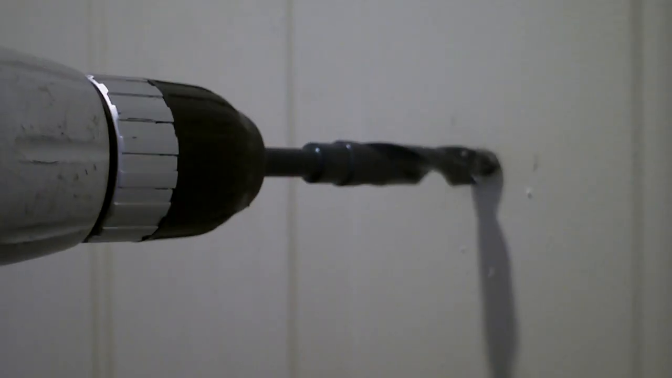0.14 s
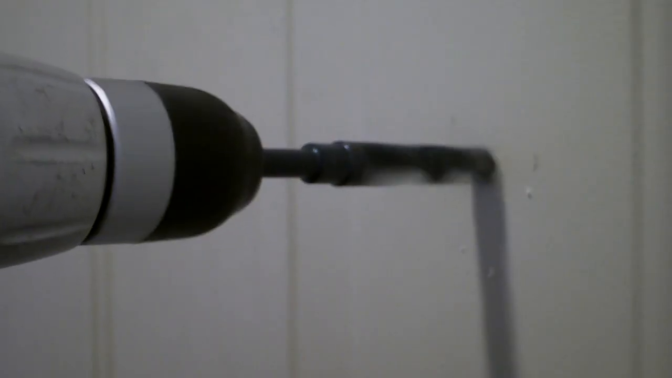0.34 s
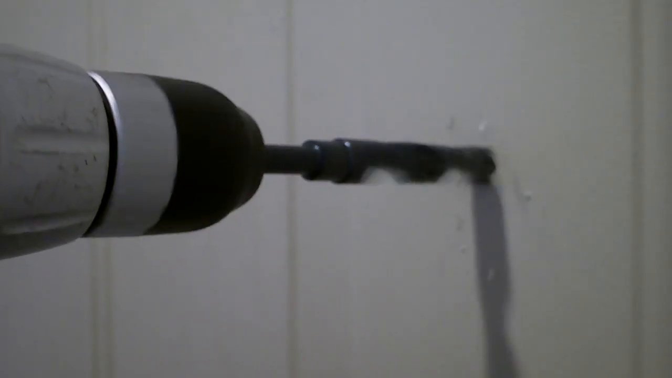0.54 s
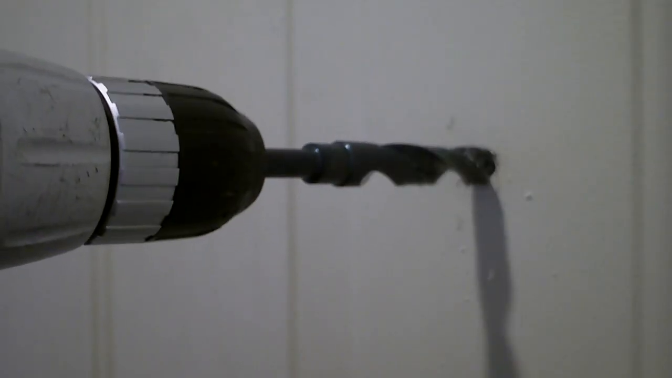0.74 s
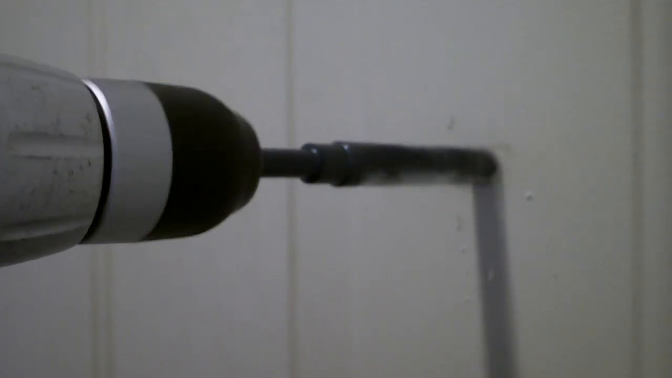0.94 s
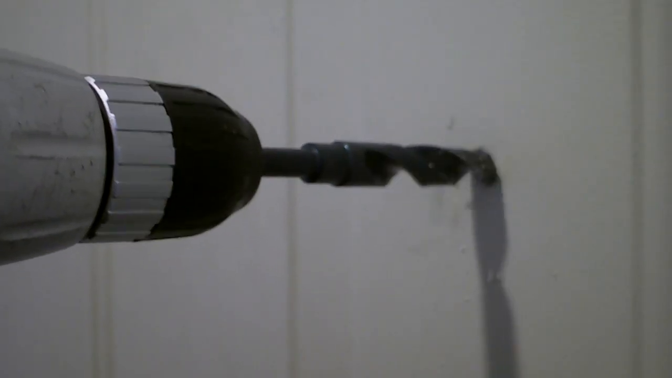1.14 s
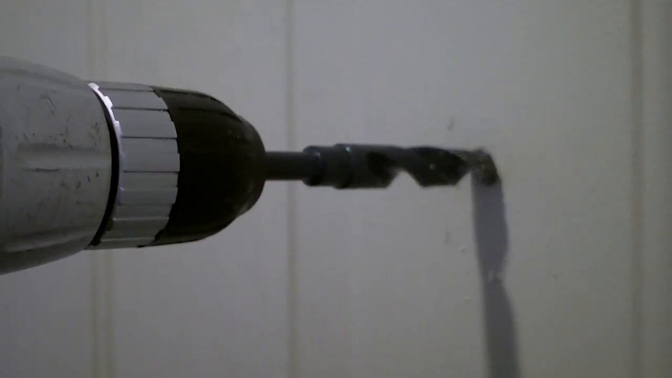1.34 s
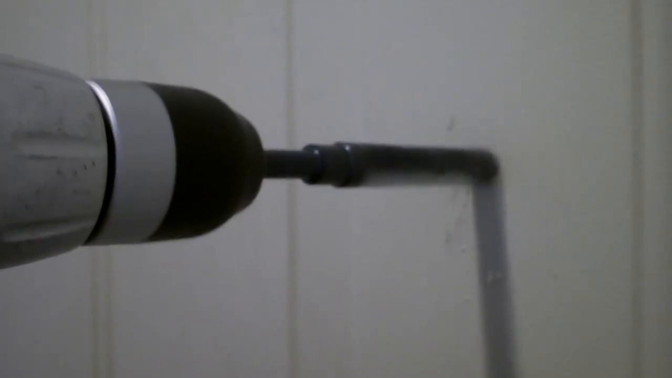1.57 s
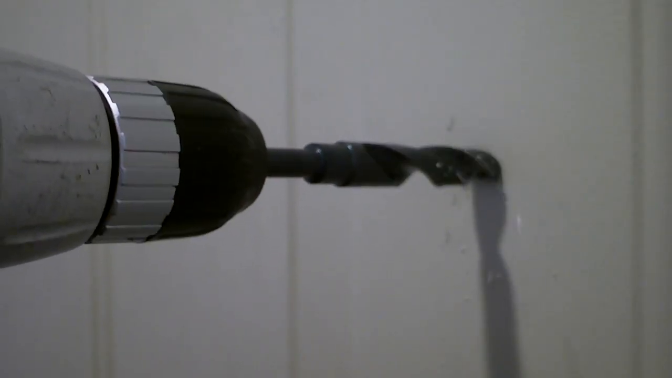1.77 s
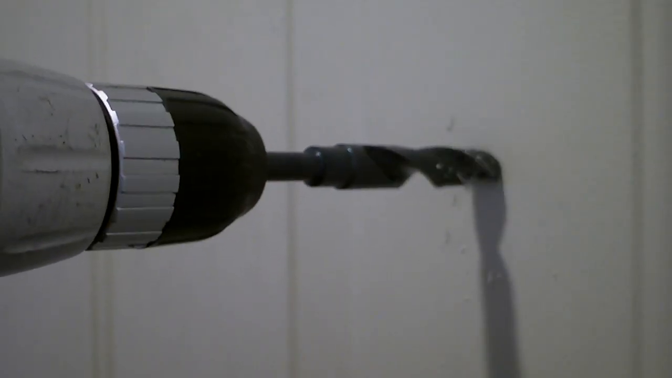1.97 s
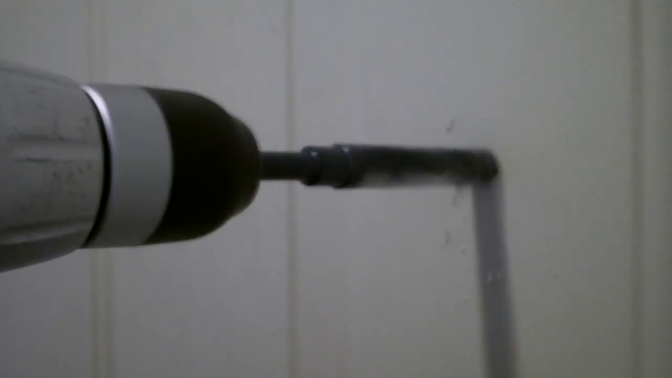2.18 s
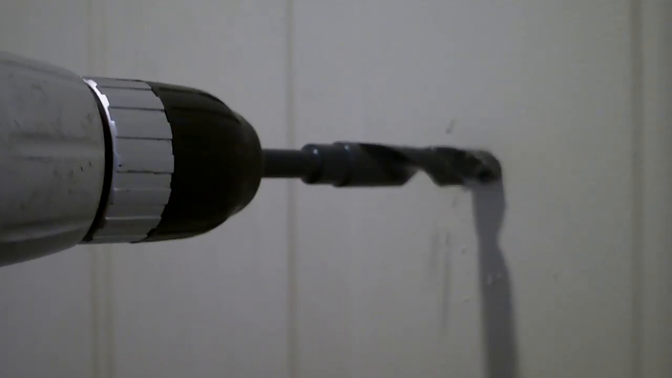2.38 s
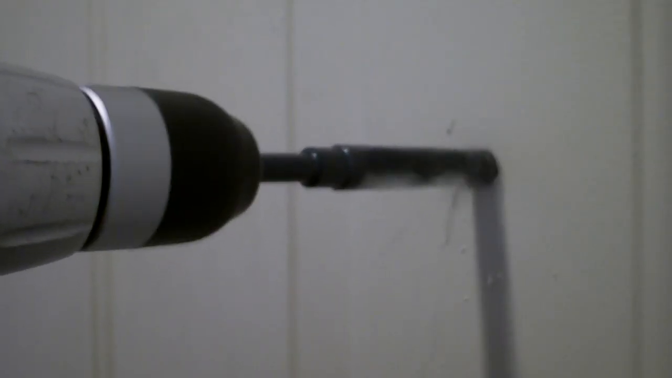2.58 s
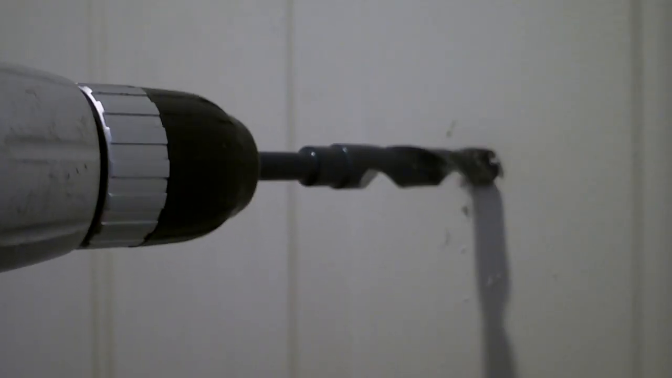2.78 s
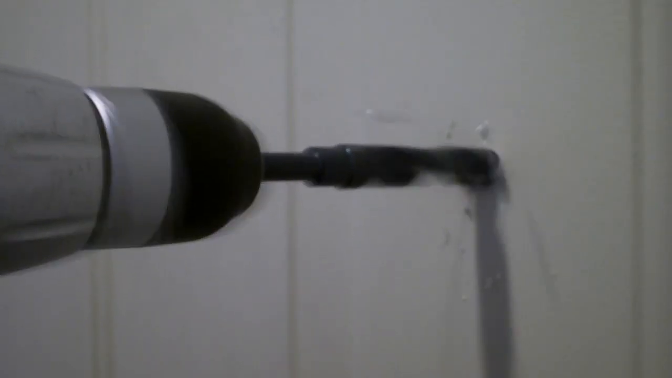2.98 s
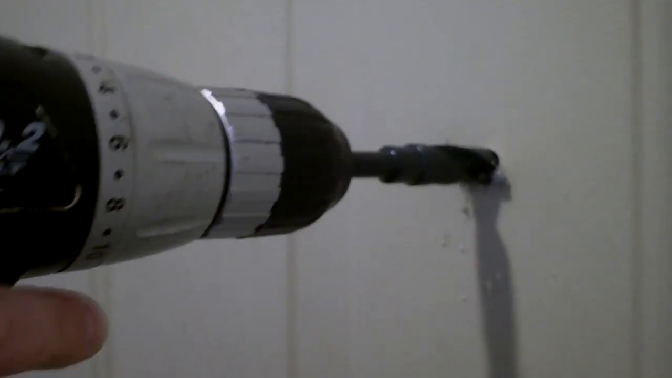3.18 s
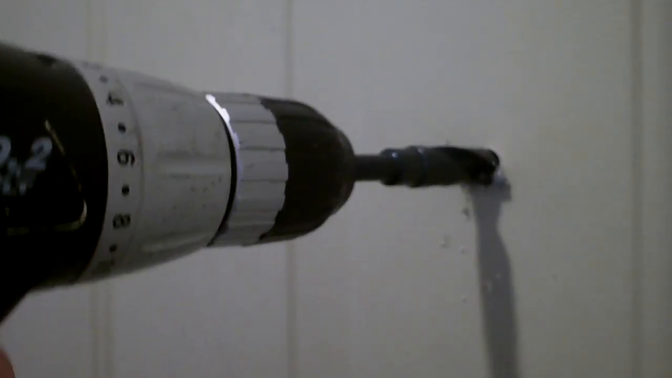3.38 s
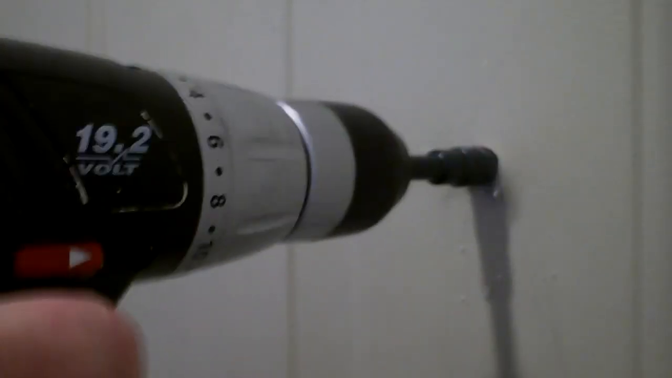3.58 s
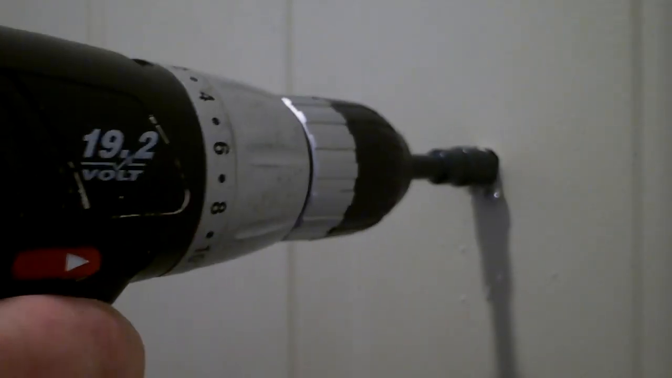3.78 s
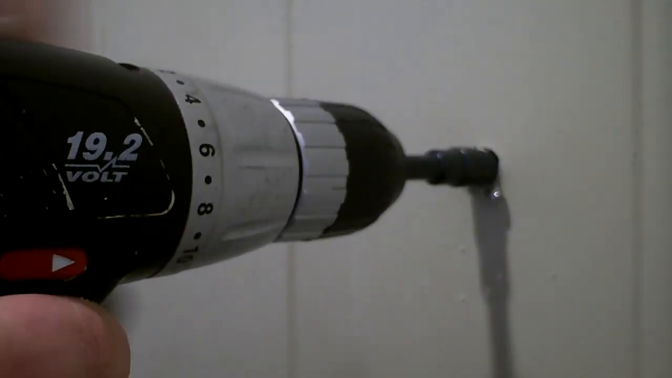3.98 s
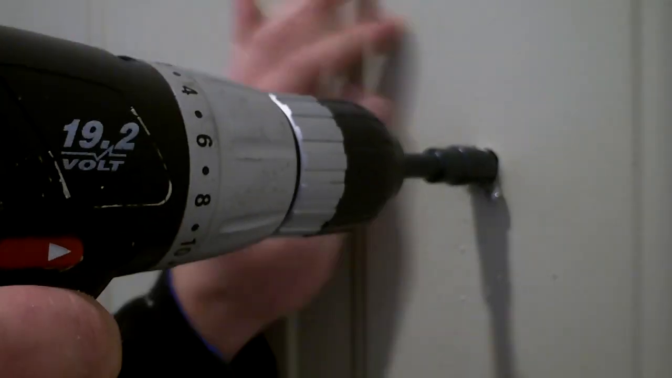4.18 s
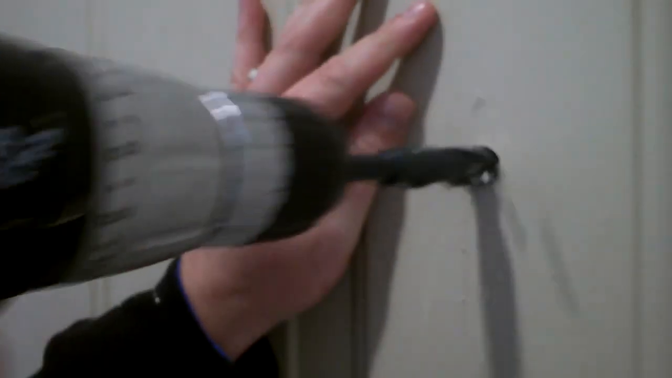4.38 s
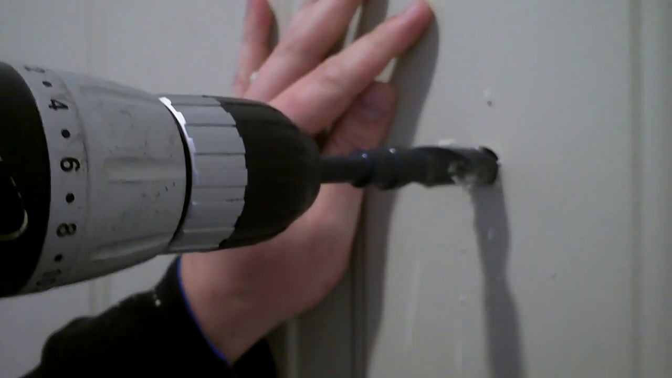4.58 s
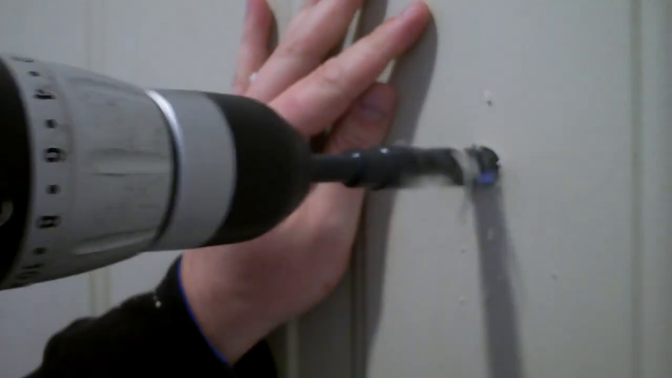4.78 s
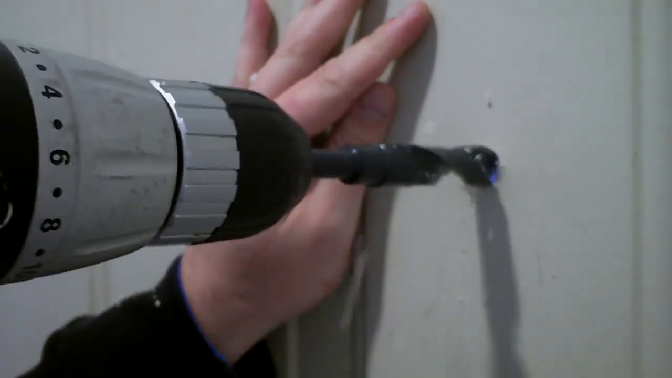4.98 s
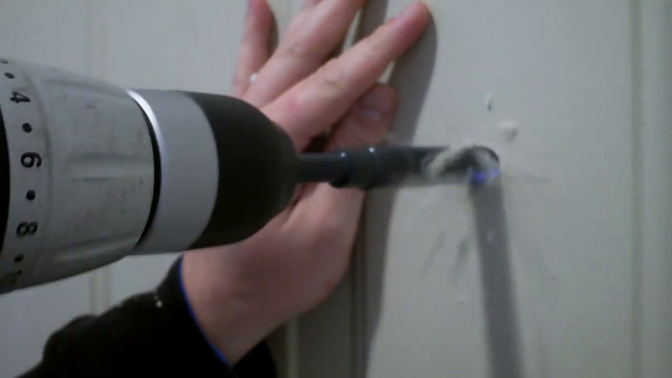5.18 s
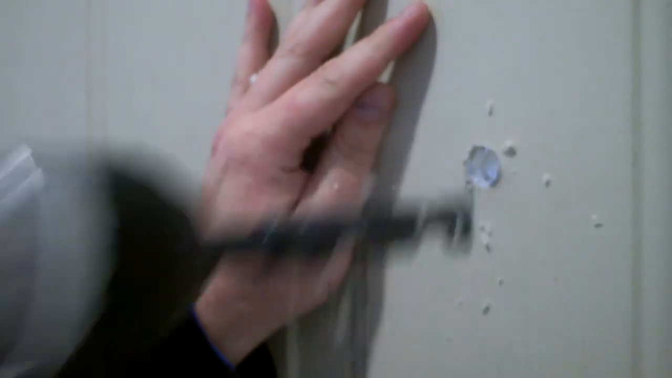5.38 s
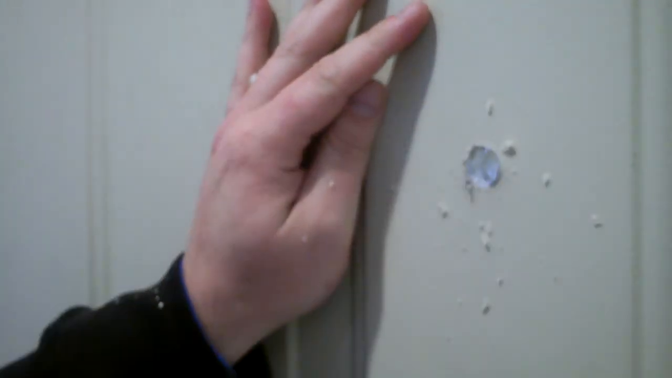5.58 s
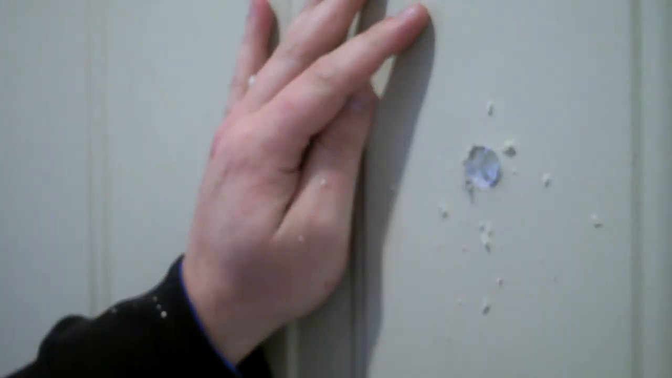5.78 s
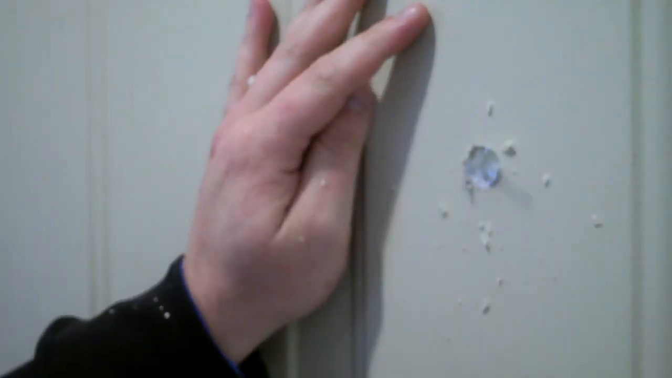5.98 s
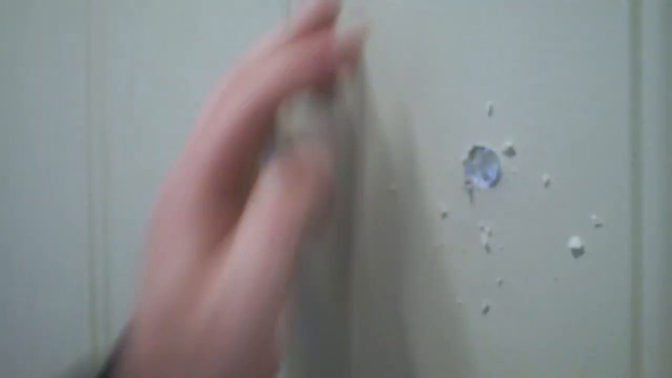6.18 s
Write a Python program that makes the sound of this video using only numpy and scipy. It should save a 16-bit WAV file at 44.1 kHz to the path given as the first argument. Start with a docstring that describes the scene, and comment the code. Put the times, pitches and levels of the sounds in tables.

```python
"""First comes the dying grind and drumming of a cordless drill in a hollow sheet-metal door, close to
one microphone in a small, bare room. Ten more pulls of the trigger follow: the controller whistles,
the gears spin up and rattle, the bit grinds off chips and drums the panel. In the later pulls
the bit snags, squeals, jolts the door and finally tears through the sheet."""
import sys
import numpy as np
from scipy import signal
from scipy.fft import rfft, irfft
from scipy.io import wavfile
from scipy.ndimage import uniform_filter1d

SR = 44100
rng = np.random.default_rng(int(sys.argv[2]) if len(sys.argv) > 2 else 0)


def inscribe(sig):
    """Save sig as 16-bit PCM at rate SR to the path in sys.argv[1].

    A 1-D sig is mono; a 2-D sig holds one channel per row.
    Samples are clipped to [-1, 1] before scaling.
    """
    pcm = np.round(np.clip(np.atleast_2d(sig).T, -1, 1) * 32767)
    wavfile.write(sys.argv[1], SR, pcm.astype(np.int16))


N = 274829
TIME = np.arange(N) / SR

# trigger pulls: start_s, length_s, run_up_s, run_down_s, creep_before_start_s,
# motor_db, grind_db, drum_db, whistle_hz
PULLS = [(-.2, 0.35, 0.023, .11, .01, -56.5, -29, -20, 3850),
         (0.299, 0.26, .03, .015, .012, -37, -21.5, -16, 3900),
         (0.865, 0.24, .025, .021, 0.01355, -38, -22, -22, 3910),
         (1.435, 0.24, .03, .018, 0.0125, -36.5, -20, -20, 4000),
         (2.073, .26, .028, .023, .016, -37, -20, -19, 3974),
         (2.487, .285, .028, .046, .014, -36, -19, -18.5, 4038),
         (2.839, .265, 0.029, .036, .016, -36.5, -20.5, -19, 3960),
         (3.392, .228, .028, 0.028, .02, -39, -22, -16, 3960),
         (4.214, 0.29, .022, 0.028, 0.099, -57, -32.5, -26, 3950),
         (4.707, .225, .035, .022, 0.036, -43.5, -30.5, -34.5, 4604),
         (5.067, 0.22, .042, .018, 0.074, -34, -25.5, -26, 3980)]
# tones of the gear train: multiple_of_motor_rate, level_db
GEAR_ORDERS = [(2, -5), (3, -6.5), (4, -3), (5, -2.5), (6, -1), (7, -5.5), (8, -8.5), (13, -15)]
# the cutting edge catches: start_s, length_s, level_db, cut_depth (0-1)
SNAGS = [(2.116, 0.0092, -38, .8), (2.514, .016, -29, 0.74), (2.852, 0.0082, -29.5, 1),
         (3.101, 0.024, -31.5, 0), (3.441, 0.024, -13.5, 0.63), (3.469, 0.031, -17, 0.1),
         (3.533, 0.028, -16.5, .05), (4.098, 0.057, -50, 0.83), (4.251, 0.061, -27, 0.35),
         (4.347, 0.027, -27, 0), (4.382, 0.018, -21.5, 0.03), (4.748, 0.034, -30, 0),
         (4.801, 0.027, -20, 0.09), (4.867, 0.026, -21, 0.12), (5.119, 0.016, -17, 0.27),
         (5.157, .027, -13.5, 0.33), (5.192, 0.026, -9, 0.06), (5.223, 0.02, -8.5, 0.3)]
# the bit binds: start_s, length_s, level_db, from_hz, to_hz, overtones_db, roughness (0-1)
SQUEALS = [(2.959, 0.0063, -12, 1820, 1730, -11, 0.18), (2.995, 0.048, -44.5, 11000, 10800, -53, .02),
           (3.025, 0.026, -16.5, 1439, 1480, -29, 0.34), (3.042, 0.02, -15, 1306, 1256, 1, .32),
           (3.442, 0.011, -13, 1034, 1018, -19, 0.27), (3.445, 0.035, -16, 341, 340.5, -31, 0),
           (4.341, 0.02, -21, 1280, 1332, -23, 0.28), (4.379, 0.03, -20.5, 1426, 1224, -6, 0.23),
           (4.408, 0.047, -45.5, 5005, 4660, -16, 0.2), (4.823, 0.02, -32.5, 3790, 4050, -32, 0.2),
           (5.165, 0.17, -31.5, 204.6, 214, -3.5, 0.31), (5.201, 0.053, -20, 318, 322, -20, 0)]
# the whole door is jolted: start_s, level_db
JOLTS = [(2.983, -11.5), (3.43, -7), (3.542, -21), (4.225, -26), (4.29, -13), (4.38, -19), (6.13, -46.5)]
# the drill bumps the door: start_s, level_db, pitch_hz
BUMPS = [(3.444, -8, 190), (3.475, -6, 170.5), (3.487, -11, 180), (4.099, -30, 112), (5.458, -24, 109),
         (6.213, -31.5, 126)]
# trigger and chuck click between pulls: start_s, level_db, decay_s
CLICKS = [(0.231, -39, 0.0011), (0.239, -36, .004), (0.828, -37, .0043), (1.99, -36, 0.0038),
          (3.361, -40.5, 0.0074), (3.874, -46, .009), (3.882, -40, 0.016), (3.905, -41.5, .006),
          (4.038, -46, 0.052), (5.592, -43.5, 0.012), (6.124, -41, 0.013)]
# modes of the door: pitch_hz, level_db, t60_s
PANEL_MODES = [(112.4, -1.5, 0.36), (143, -16, 0.12), (213.5, -6.5, 0.36), (317.1, -12.5, 0.26),
               (519.6, -17, 0.32), (627, -31.5, 0.6), (782, -16, 0.29), (1003, -18, 0.22),
               (1256, -28, 0.59), (1320, -13, 0.3), (1546, -18.5, 0.4), (1660, -23, 0.38),
               (2044, -15, 0.076)]
HINGE_MODES = [(18.44, -0.5, 0.66), (28.2, -2.5, 0.45), (54, -12, 0.49)]
# spectral outlines: frequency_hz, level_db
GEARBOX_SPECTRUM = [(200, -6.5), (700, -3), (1700, 14), (2400, -2), (4000, 9), (5500, -1.5), (8000, -3),
                    (11000, -7), (13500, -16.5), (15000, -51)]  # rattling housing
CHIP_SPECTRUM = [(150, -10), (260, -17.5), (330, -0.5), (410, -6), (510, 0.5), (560, -7.5), (635, 0),
                 (930, -5), (1500, -6), (1680, -2.5), (2300, -13), (3400, -12), (6000, -36), (9000, -61)]  # breaking chips
SHEET_SPECTRUM = [(120, -26.5), (220, -4), (318, 5), (430, -10.5), (750, -8), (1250, 2.5), (1720, 8.5),
                  (2000, 0), (2450, -6.5), (3300, -7), (5000, -15.5), (6700, -30.5), (9500, -24.5),
                  (14000, -53)]  # sheet under a shallow cut
DRUM_SPECTRUM = [(12, -29.5), (26, 0.5), (40, -7), (52, -13.5), (72, -17), (105, 8.5), (150, -6.5),
                 (200, -7.5), (280, -15.5), (500, -60)]  # hollow body of the door
CLICK_SPECTRUM = [(100, -12.5), (700, 7), (1600, 2), (3500, -2.5), (6000, -12.5), (11000, -16),
                  (15000, -31)]  # plastic ticks
ROOM_TONE_SPECTRUM = [(15, -12), (25, 12.5), (80, -4), (115, -10), (178, -8), (300, -11), (1800, -26),
                      (4000, -31), (8000, -42), (12000, -46.5), (15000, -52.5)]  # background rumble
# reverberation off the walls: band_hz, t60_s, level_db
ROOM_BANDS = [(99.2, 0.77, -21), (398, 0.49, -10.5), (900, 0.63, -14), (1580, 0.7, -13.5),
              (3070, 0.64, -17), (4800, 0.59, -15.5), (7650, 0.45, -21.5), (14000, .3, -24)]

MOTOR_HZ, FULL_SPEED_DB = 293.4, -39  # top turning rate, and the motor_db that reaches it
GEAR_POWER, CUT_POWER, PUSH_POWER = 2.8, 2.57, 2.36  # each gain grows as this power of the spin
CREEP_DB = -24  # brush hiss while the motor barely turns, relative to the running motor
WHINE_DB, GRIND_DB, RING_DB, DRUM_DB, ROOM_TONE_DB = -27, -2, -6, -1.5, -52.5
CHATTER_HZ = 516.5  # mean pace of a snagged edge, before jitter adds more slips


def trigger_pulls():
    """Each pull spins up and brakes the motor, giving gains for rattle (drive), chips (cut), door (push)."""
    drive, cut, push = np.zeros((3, N))
    for start, length, run_up, run_down, creep, motor_db, grind_db, drum_db, _ in PULLS:
        t = np.clip(TIME - start, 0, length)
        spin = (1 - np.exp(-t / run_up)) * (1 - np.exp((t - length) / run_down))
        creeping = np.interp(TIME - start, [-creep, 0, length / 2], [0, 1, 0])
        drive += undb(motor_db) * np.maximum(spin ** GEAR_POWER, undb(CREEP_DB) * creeping)
        cut += undb(grind_db) * spin ** CUT_POWER
        push += undb(drum_db) * spin ** PUSH_POWER
    for start, db in JOLTS:  # a jolt also sets the panel drumming
        add(push, start, undb(db - 6.5) * np.exp(-TIME[:SR] / 0.018))
    return drive, lag(cut, seconds=0.0046), lag(push, seconds=0.017)


def motor(drive, speed, angle):
    """Brushes and gear teeth rattle the housing; the gears whine up and down with the speed."""
    teeth = impacts(per_s=9000, scatter_db=4.1) * (1 + 0.1 * np.cos(angle))
    rattle = colour(teeth, GEARBOX_SPECTRUM)
    rattle /= band_rms(rattle, 6000, 12000)
    whine = unit(sum(undb(db + 6 * wander(rate_hz=60)) * np.sin(k * angle) for k, db in GEAR_ORDERS))
    return drive * rattle + undb(WHINE_DB) * speed ** 3.4 * whine


def grinding(angle):
    """Chips break off the sheet in a dense crackle that surges as the two flutes come round."""
    surge = undb(1.2 * np.cos(angle / 9) + 2.03 * wander(rate_hz=260))
    chips = colour(impacts(per_s=4500, scatter_db=2.5) * surge, CHIP_SPECTRUM)
    return undb(GRIND_DB) * chips / band_rms(chips, 400, 1100)


def door_drumming(push):
    """The shaking bit drums the hollow door, and its panel modes ring on."""
    modes = ringing(PANEL_MODES)
    blows = unit(impacts(per_s=900, scatter_db=2.8)) * push
    ring = signal.fftconvolve(blows, modes / np.linalg.norm(modes))[:N]
    drum = colour(impacts(per_s=700, scatter_db=2.5), DRUM_SPECTRUM)
    drum /= band_rms(drum, 80, 250)
    return undb(RING_DB) * ring + undb(DRUM_DB) * drum * push


def snags():
    """The edge slips over the burr in uneven jerks; a shallow cut rings the sheet, a deep one crunches."""
    out = np.zeros(N)
    for start, length, db, depth in SNAGS:
        t, envelope = stroke(length, rise_s=0.0035, fall_s=0.016)
        jitter, tear = rng.standard_normal((2, len(t)))
        cycles = np.cumsum(CHATTER_HZ * (1 + 2.5 * jitter)) / SR
        slips = np.diff(np.floor(cycles), prepend=0) > 0
        force = unit(slips * rng.uniform(0.37, 1, len(t))) + tear
        ring = np.sqrt(1 - depth) * unit(colour(force, SHEET_SPECTRUM))
        crunch = np.sqrt(depth) * unit(colour(force, CHIP_SPECTRUM))
        add(out, start, undb(db) * envelope * unit(ring + crunch))
    return out


def squeals():
    """Stick and slip lock into a rough, gliding tone as the bit binds."""
    out = np.zeros(N)
    for start, length, db, from_hz, to_hz, overtones_db, roughness in SQUEALS:
        t, envelope = stroke(length, rise_s=0.006, fall_s=0.009)
        hz = np.interp(t, [0, length], [from_hz, to_hz])
        add(out, start, undb(db) * envelope * rough_tone(hz, roughness, overtones_db))
    return out


def door_thuds():
    """The door sways on its hinges after a jolt; a bump from the drill gives a dull knock."""
    out, t = np.zeros(N), TIME[:SR]
    for start, db in JOLTS:
        add(out, start, undb(db) * ringing(HINGE_MODES) * (1 - np.exp(-t / 0.0091)))
    for start, db, hz in BUMPS:
        add(out, start, undb(db) * np.sin(2 * np.pi * hz * t) * np.exp(-t / 0.0041))
    return out


def controller_whistles():
    """Chopped current makes the windings sing briefly as the trigger goes in."""
    out = np.zeros(N)
    t, envelope = stroke(length_s=0.032, rise_s=0.0017, fall_s=0.006)
    for start, *_, motor_db, _, _, hz in PULLS:
        if start > 0:
            tone = rough_tone(np.full(len(t), hz), roughness=0.14, overtones_db=-39)
            add(out, start, undb(min(motor_db, FULL_SPEED_DB) - 4) * envelope * tone)
    return out


def clicks():
    """Trigger and chuck give plastic ticks, and the gears tick as they take up slack at each start."""
    out, t = np.zeros(N), TIME[:SR // 5]
    slack_ticks = [(start + 0.002, motor_db + 3, 0.014)
                   for start, *_, motor_db, _, _, _ in PULLS if start > 0]
    for start, db, decay in CLICKS + slack_ticks:
        add(out, start, undb(db) * np.exp(-t / decay) * rng.standard_normal(len(t)))
    return colour(out, CLICK_SPECTRUM)


def wall_reverb(near):
    """Bare walls send a diffuse tail back to the microphone; the treble dies first."""
    t = TIME[:SR]
    spectrum = rfft(rng.standard_normal(SR))
    octaves = np.log2(np.arange(len(spectrum)) + 1)
    centres = np.log2([row[0] for row in ROOM_BANDS])
    tail = 0
    for share, (hz, t60, db) in zip(np.eye(len(ROOM_BANDS)), ROOM_BANDS):
        band = irfft(spectrum * np.interp(octaves, centres, share), SR)
        decay = undb(-60 * t / t60) * (1 - np.exp(-t / 0.0057))
        tail += undb(db) * band * decay / np.linalg.norm(decay)
    return signal.fftconvolve(near, tail)[:N]


def room_tone():
    """A faint, steady rumble fills the room behind the drill."""
    return undb(ROOM_TONE_DB) * unit(colour(rng.standard_normal(N), ROOM_TONE_SPECTRUM))


def rough_tone(hz, roughness, overtones_db):
    """A tone with overtones, whose cycles vary in length and strength."""
    smooth = lambda x: uniform_filter1d(x, SR // 2000)
    jitter, flutter = (unit(smooth(smooth(row))) for row in rng.standard_normal((2, len(hz))))
    phase = 2 * np.pi * np.cumsum(hz * (1 + 0.25 * roughness * jitter)) / SR
    overtones = np.sin(2 * phase) + 0.27 * np.sin(3 * phase) + 0.17 * np.sin(4 * phase)
    return unit((np.sin(phase) + undb(overtones_db) * overtones) * (1 + roughness * flutter))


def ringing(modes):
    """One second of decaying modes."""
    t = TIME[:SR]
    return sum(undb(db - 60 * t / t60) * np.sin(2 * np.pi * hz * t) for hz, db, t60 in modes)


def impacts(per_s, scatter_db):
    """Tiny impacts at random moments and of uneven size."""
    hits = rng.random(N) < per_s / SR
    return hits * rng.choice([-1, 1], N) * undb(scatter_db * rng.standard_normal(N))


def stroke(length_s, rise_s, fall_s):
    """Times and envelope of a contact that builds up, holds and lets go."""
    t = TIME[:SR // 5]
    return t, (1 - np.exp(-t / rise_s)) * np.exp(-np.maximum(t - length_s, 0) / fall_s)


def wander(rate_hz):
    """Smooth random drift with rms 1."""
    hold = int(SR / rate_hz)
    steps = np.repeat(rng.standard_normal(N)[:N // hold + 1], hold)
    return unit(uniform_filter1d(steps, hold)[:N])


def lag(x, seconds):
    """Follow a control a little late and let it die away."""
    keep = np.exp(-1 / (seconds * SR))
    return signal.lfilter([1 - keep], [1, -keep], x)


def colour(x, outline, size=8192):
    """Minimum-phase filter with the given spectral outline."""
    hz, db = np.transpose(outline)
    freqs = np.maximum(np.arange(size // 2 + 1) * SR / size, 1)
    gain = undb(np.interp(np.log(freqs), np.log(hz), db))
    cepstrum = irfft(np.log(gain))
    cepstrum[1:size // 2] *= 2
    cepstrum[size // 2 + 1:] = 0
    return signal.fftconvolve(x, irfft(np.exp(rfft(cepstrum))))[:len(x)]


def band_rms(x, low_hz, high_hz):
    """Rms within a band."""
    return np.std(signal.sosfilt(signal.butter(4, [low_hz, high_hz], "band", fs=SR, output="sos"), x))


def add(track, start_s, sound):
    """Mix a sound into a track from a start time on."""
    i = max(int(start_s * SR), 0)
    track[i:i + len(sound)] += sound[:len(track) - i]


def undb(db):
    """Decibels to gain."""
    return 10 ** (np.asarray(db) / 20)


def unit(x):
    """Scale to rms 1."""
    return x / np.sqrt(np.mean(x ** 2) + 1e-18)


def scene():
    """Drill and door close to the microphone, the small room behind them, in mono."""
    drive, cut, push = trigger_pulls()
    speed = np.minimum(drive / undb(FULL_SPEED_DB), 1) ** (1 / GEAR_POWER)  # gentle pulls stay below 1
    motor_hz = MOTOR_HZ * speed * (1 + 0.0288 * wander(rate_hz=70))
    angle = 2 * np.pi * np.cumsum(motor_hz) / SR
    near = motor(drive, speed, angle) + cut * grinding(angle) + door_drumming(push)
    near += snags() + squeals() + controller_whistles() + clicks()
    return (near + door_thuds() + room_tone() + wall_reverb(near))[None]


def record(dry):
    """The recorder clips peaks at full scale and cuts the treble above 15 kHz."""
    low_pass = signal.ellip(8, 0.2, 70, 15000, fs=SR, output="sos")
    return signal.sosfilt(low_pass, np.clip(dry, -1, 1))


dry = scene()
out = record(dry)
inscribe(out)
```